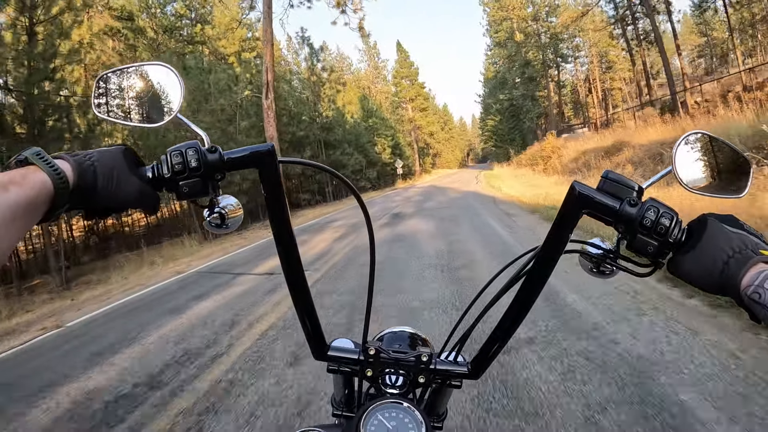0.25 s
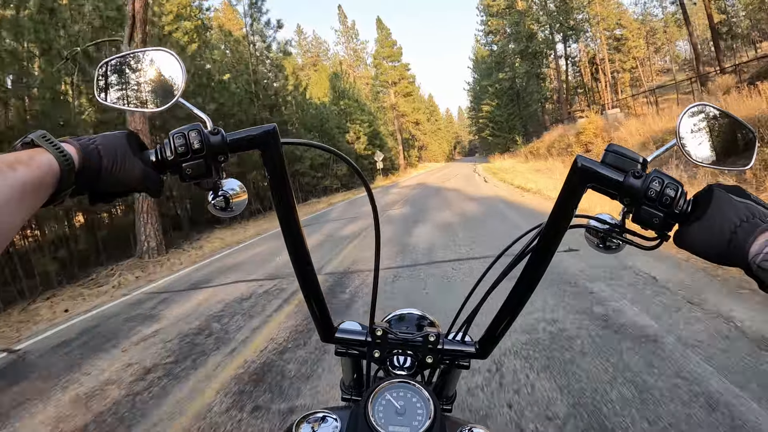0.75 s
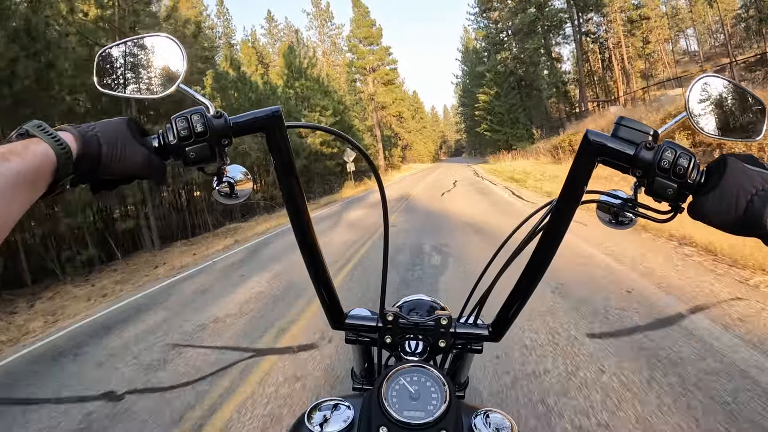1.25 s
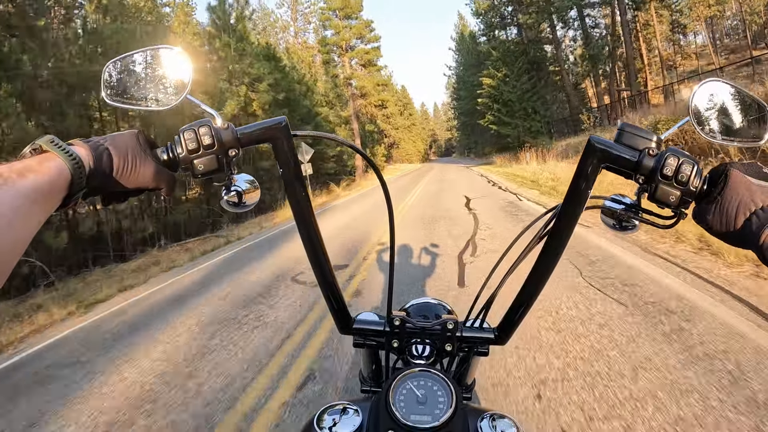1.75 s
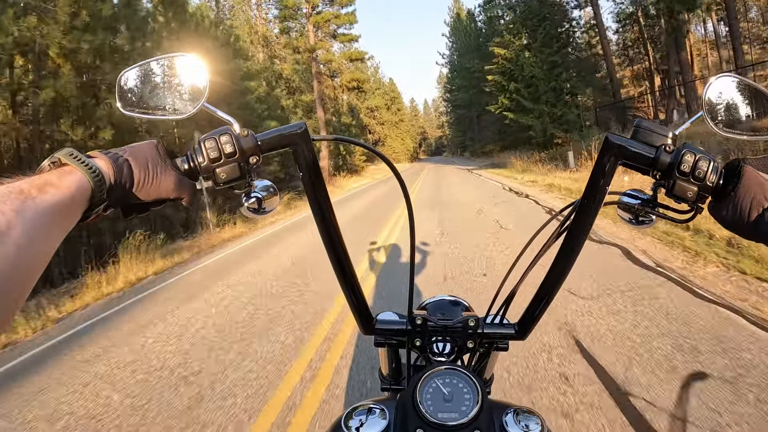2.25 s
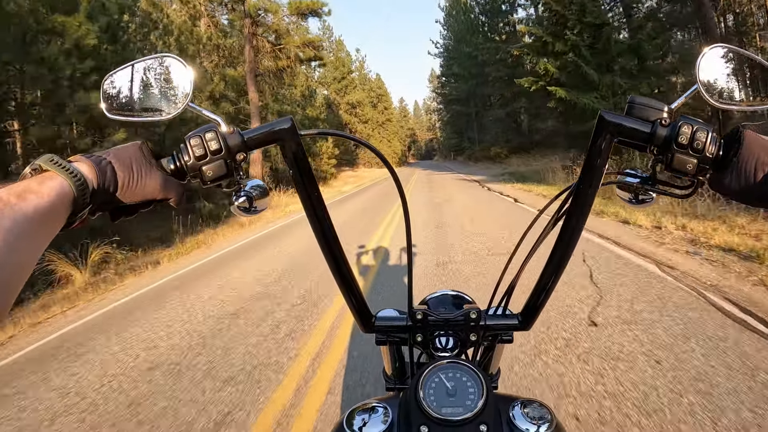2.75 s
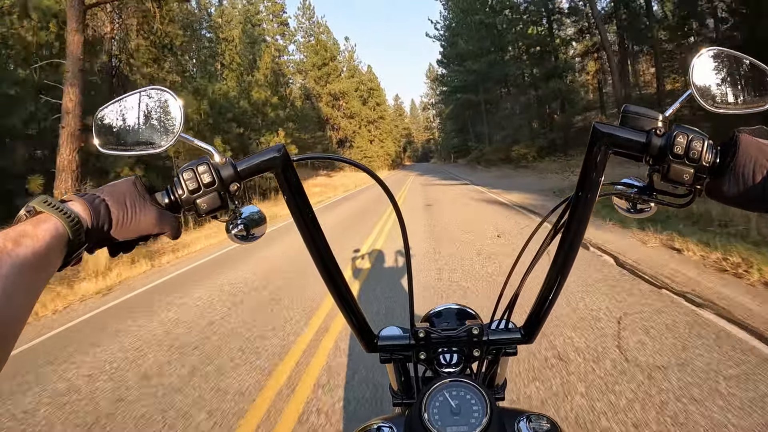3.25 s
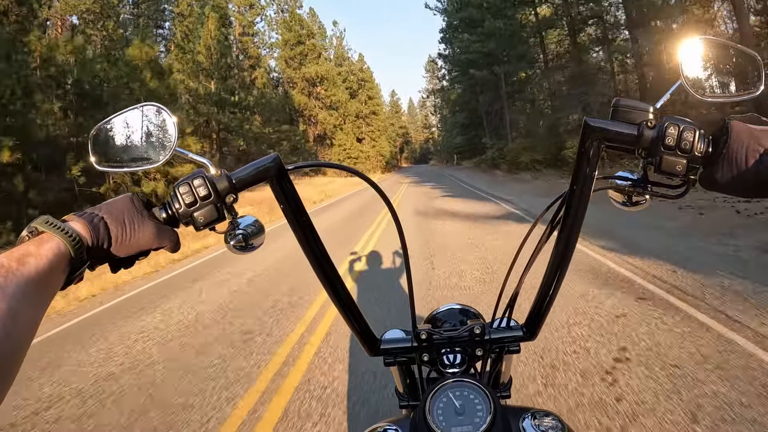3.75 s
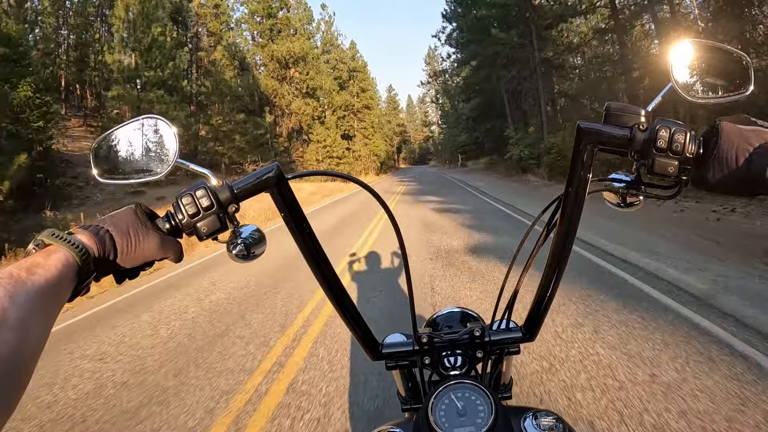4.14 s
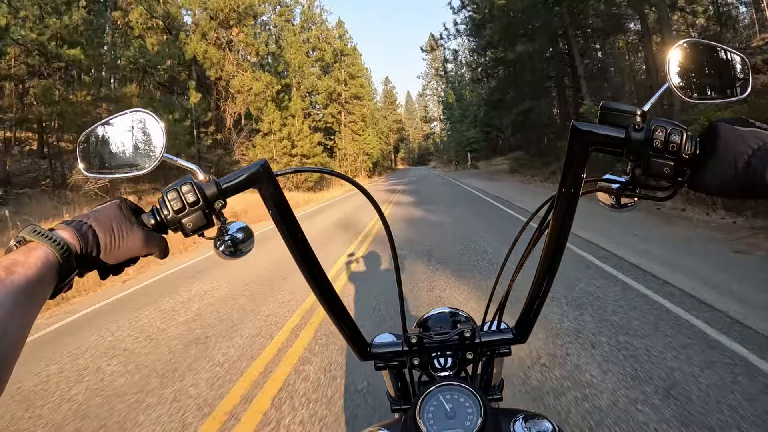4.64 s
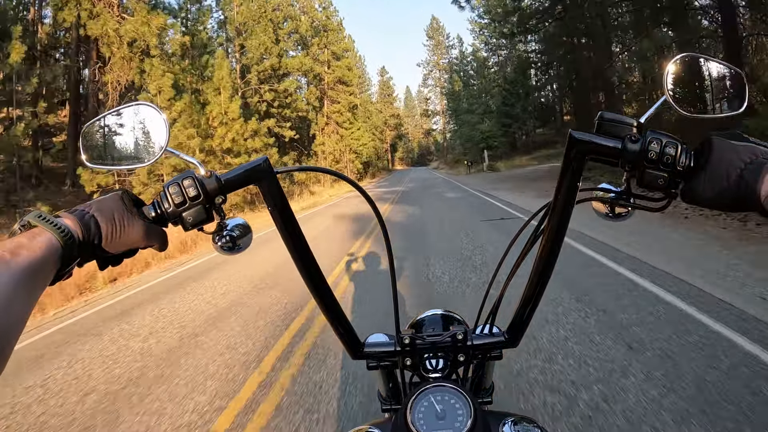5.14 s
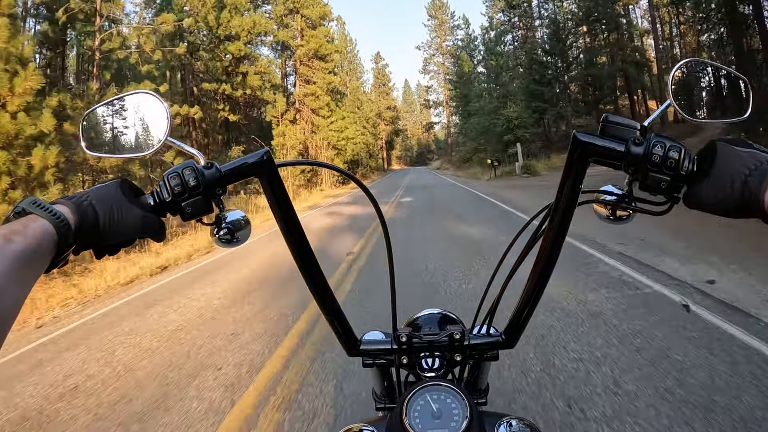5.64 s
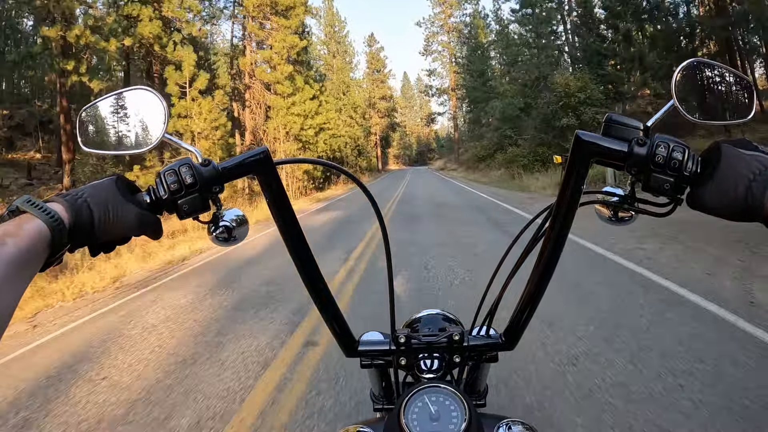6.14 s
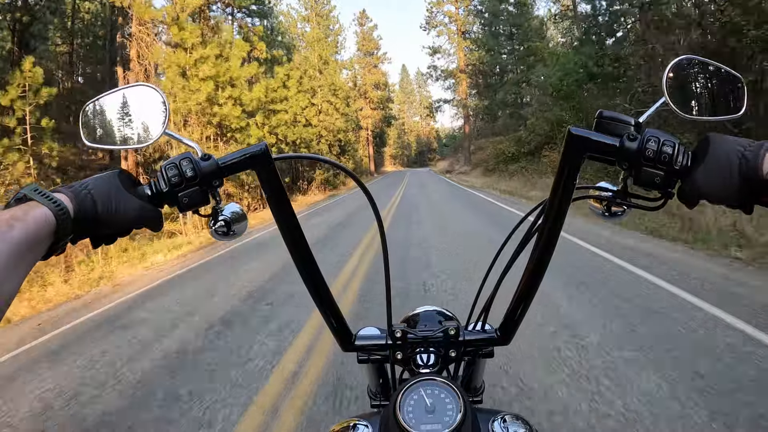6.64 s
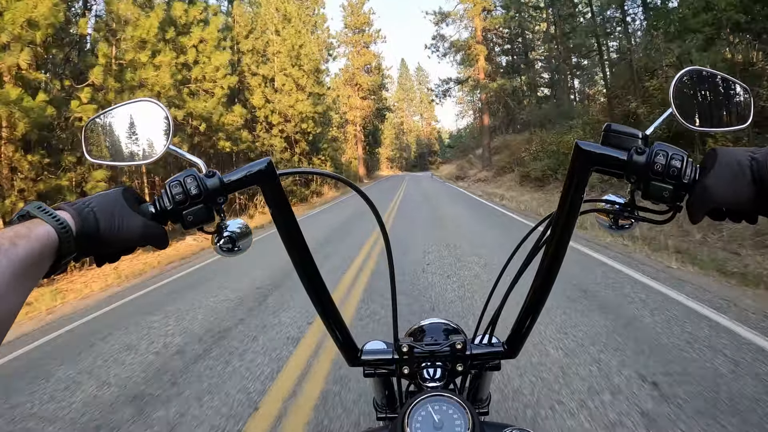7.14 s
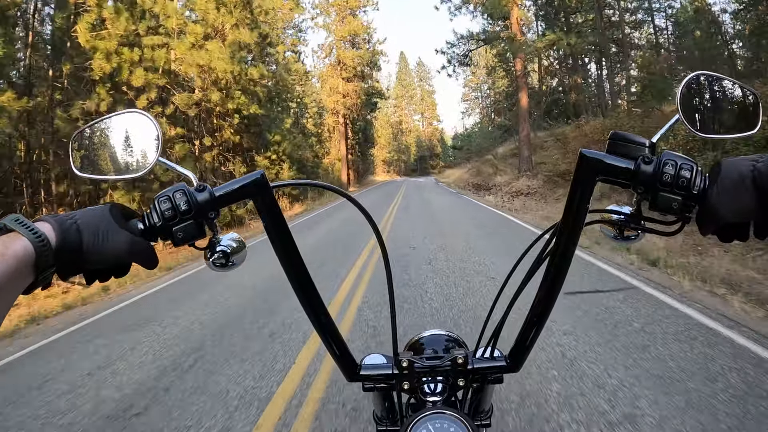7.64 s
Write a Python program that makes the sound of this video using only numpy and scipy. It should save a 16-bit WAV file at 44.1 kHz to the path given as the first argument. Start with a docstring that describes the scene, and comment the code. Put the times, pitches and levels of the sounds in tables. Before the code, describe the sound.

Close, continuous motorcycle ride in open air, captured at the rider's body: booming, lopsided paired exhaust beats, mechanical rattle, thin gear whine, low wind thumps and rushing air and tyres. The engine pulls, briefly cracks and rasps harder, then cruises with less bite while the wind builds to a broad peak. Near the end the throttle shuts, leaving a softer uneven burble as the pitch falls slightly.

```python
"""A forest road, heard from the chest of someone riding a V-twin motorcycle with short open pipes.
It pulls gently, barks as the throttle opens, cruises through a swell of headwind, then runs on, throttle shut.
Two unevenly spaced exhaust pulses per cycle ring pipe resonances, with a crack and noise bursts for the rasp.
A partly repeating noise makes the valve-gear clatter, sines locked to the crank the drive-train whine,
and coloured noise the buffeting and rushing air."""
import sys
import numpy as np
from scipy import signal
from scipy.fft import rfft, irfft, next_fast_len
from scipy.io import wavfile
from scipy.ndimage import uniform_filter1d

SR = 44100
rng = np.random.default_rng(int(sys.argv[2]) if len(sys.argv) > 2 else 0)


def store_wav(level_fs):
    """Save 16-bit WAV to argv[1]."""
    pcm = np.round(np.clip(np.atleast_2d(level_fs), -1, 1) * 32767)
    wavfile.write(sys.argv[1], SR, pcm.T.astype(np.int16))


N = 348390
TIME = np.arange(N) / SR

# engine speed: (time [s], four-stroke cycle rate [Hz])
SPEED = [(0, 20.66), (0.7, 21.61), (1.72, 22.69), (2.5, 24.72), (3.3, 25.94), (4.3, 26.41), (5.6, 26.54),
         (6.5, 26.8), (6.7, 25.31), (6.9, 26.02), (7.3, 25.43), (7.9, 24.17)]
REFERENCE_HZ = 26.94  # cycle rate about which levels change with engine speed
BLOW_LAG = .045  # from the valve's opening to the blowdown pulse [cycles]


def undb(db):
    """Decibels to gain."""
    return 10 ** (np.asarray(db) / 20)


def unit(x):
    """Scale to rms 1."""
    return x / np.sqrt(np.mean(x ** 2))


def curve(table):
    """Points joined by straight lines in time."""
    return np.interp(TIME, *np.transpose(table))


def walk(rate):
    """Slow random drift with rms 1: random steps at the given rate [Hz], smoothed twice."""
    step = int(SR / rate)
    steps = np.repeat(rng.standard_normal(N // step + 1), step)
    smooth = uniform_filter1d(uniform_filter1d(steps, step), step)
    return unit(smooth[:N])


def through(x, response):
    """Pass a sound through a frequency response."""
    size = next_fast_len(N + SR // 2)  # spare room for the ringing
    hz = np.maximum(np.arange(size // 2 + 1) * SR / size, 1)
    return irfft(rfft(x, size) * response(hz), size)[:N]


def colour(x, points):
    """Give a sound a spectrum, drawn on a logarithmic frequency axis, at rms 1."""
    hz, db = np.transpose(points)
    return unit(through(x, lambda f: undb(np.interp(np.log(f), np.log(hz), db))))


def resonance(f, hz, width):
    """Response of one damped resonance, gain 1 at its centre."""
    return 1 / (1 + 1j * (f / hz - hz / f) * hz / width)


def ring(x, modes, soft_hz=483, muffle_hz=375):
    """Rounded gas pulses ring a set of pipe resonances; the rider's body shades the upper ones."""
    def response(f):
        pipe = sum(np.sign(sign) * undb(db) * resonance(f, hz, width) for hz, width, db, sign in modes)
        rounding = 1 - (f / soft_hz) ** 2 + 1j * f / soft_hz
        shading = np.sqrt(1 + (f / muffle_hz) ** 10)
        return pipe / rounding / shading
    return through(x, response)


def pulses(crank, angles, sizes):
    """One click whenever the crank reaches one of the angles, shared between two samples."""
    inside = (angles > crank[0]) & (angles < crank[-2])
    at = np.interp(angles[inside], crank, np.arange(N))
    i, part = at.astype(int), at % 1
    early = np.bincount(i, sizes[inside] * (1 - part), N)
    late = np.bincount(i + 1, sizes[inside] * part, N)
    return early + late


def rider():
    """Throttle opening and share of overrun, both 0-1; overrun takes over as the throttle snaps shut."""
    # a gentle pull, a quick twist that eases off, then cruising: (time [s], throttle opening [0-1])
    throttle_points = [(0, 0.59), (1.77, 0.49), (1.97, 1), (2.38, 0.74), (2.78, 0.61), (2.92, 0.58),
                       (3.8, .22), (5.4, 0.28)]
    shut_s, closing_s, overrun_share = 6.53, 0.14, 0.77
    overrun = overrun_share * np.clip((TIME - shut_s) / closing_s, 0, 1)
    return curve(throttle_points), overrun


def headwind():
    """One long swell of the headwind, 0-1, a bell that rises faster than it falls."""
    peak_s, rise_s, fall_s = 4.99, 1.02, 1.43
    spread = np.where(TIME < peak_s, rise_s, fall_s)
    return np.exp(-.5 * ((TIME - peak_s) / spread) ** 2)


def wind(gust_db=-0.16, flutter_db=1.04):
    """Eddies thump the microphone; air and tyres rush above them, fluttering. Both grow with the headwind."""
    # spectrum of the rushing air and tyres: (frequency [Hz], relative level [dB per Hz])
    rush_spectrum = [(40, -26), (120, 4.5), (250, -2), (450, -10.5), (800, -22.5), (1200, -36.5),
                     (1600, -27), (2500, -33), (5000, -41.5), (6200, -46), (7600, -50), (9000, -56),
                     (15000, -64.5)]
    # spectrum of the low buffeting: (frequency [Hz], relative level [dB per Hz])
    rumble_spectrum = [(10, -18.5), (22, 3), (45, 5), (70, -4), (120, -15.5), (250, -42.5), (600, -77)]
    # level in calm air, and gain at the top of the swell
    rush_db, rush_swell_db = -28.5, 5.5
    buffet_db, buffet_swell_db = -24, 6.5
    swell = headwind()
    rumble = colour(rng.standard_normal(N), rumble_spectrum) * undb(buffet_db + buffet_swell_db * swell)
    eddies = rng.standard_normal(N) * undb(gust_db * walk(21) + flutter_db * walk(70))
    rush = colour(eddies, rush_spectrum) * undb(rush_db + rush_swell_db * swell)
    return rumble + rush


def whine(crank, whine_db=-0.36, waver_db=2, slack_db=-5):
    """Chain and gears sing faintly at multiples of the cycle rate, wavering, softer on the overrun."""
    # drive-train tones: (multiple of the cycle rate, relative level [dB], growth [dB per Hz of cycle rate])
    tone_table = [(16, -44, 1), (20, -52, -.5), (22, -50, 2), (23, -50, .5), (25, -46, 3), (26, -50, .3),
                  (30, -51, 4), (31, -53, 1), (35, -54, .3), (37, -53, -.3), (45, -47, 7), (46, -49, 7)]
    faster = curve(SPEED) - REFERENCE_HZ
    _, overrun = rider()
    tones = np.zeros(N)
    for order, db, growth in tone_table:
        level = undb(db + growth * faster + waver_db * walk(4.8))
        tones += np.sqrt(2) * level * np.sin(2 * np.pi * order * crank)
    return tones * undb(whine_db + slack_db * overrun)


def clatter(crank, loose=1.9, loose_db_per_hz=1.4, throb=0.15, count=2048):
    """Valve gear and chain: a partly repeating rattle, looser with speed, throbbing twice a cycle."""
    # spectrum of the rattle: (frequency [Hz], relative level [dB per Hz])
    clatter_spectrum = [(250, -20), (400, -6), (520, -3), (660, 0), (800, 1), (1050, 3), (1140, 5),
                        (1215, 4), (1380, -4.5), (2000, -19.5), (4000, -24.5), (4900, -29), (6000, -35.5),
                        (12000, -47.5)]
    level_db, db_per_hz, wind_swell_db = -40, 0.03, 2.5  # also grows along with the headwind
    faster = curve(SPEED) - REFERENCE_HZ
    one_cycle = rng.standard_normal(count)
    steady = np.interp(crank % 1 * count, np.arange(count), one_cycle)
    throbbing = 1 + throb * np.cos(4 * np.pi * (crank - BLOW_LAG))
    play = loose * undb(loose_db_per_hz * faster)  # random part against the repeating part
    rattle = throbbing * (unit(steady) + play * rng.standard_normal(N)) / np.hypot(1, play)
    return colour(rattle, clatter_spectrum) * undb(level_db + db_per_hz * faster + wind_swell_db * headwind())


def exhaust(crank, cylinder, pipe, scatter_db=-0.45, crack_hz=1170, crack_width=450, crack_lead=0.016,
            choke=0.32, blow_share=0.99, crack_scatter_db=1.3, rasp_scatter_db=1.84, overrun_scatter_db=1.26):
    """One cylinder: the valve cracks open, gas blows down and rasps, then the piston pushes out the rest."""
    # blowdown resonance: (frequency [Hz], width [Hz], relative level [dB], polarity)
    blow_modes = [(109.7, 20.1, -18, -1)]
    # pipe full of cool gas on the overrun: (frequency [Hz], width [Hz], relative level [dB], polarity)
    cool_modes = [(103.4, 172, -20.5, -1), (143.3, 60.4, -20.5, 1), (201, 174, -28.5, 1),
                  (294.4, 23, -36, 1)]
    # spectrum of the gas jet: (frequency [Hz], relative level [dB per Hz])
    rasp_spectrum = [(200, -14), (600, -2), (1000, 6.5), (1230, 7), (1480, -9), (1800, -0.5), (2300, -12.5),
                     (2950, -10), (3900, -16), (4500, -12.5), (5200, -13), (5800, -32.5), (7000, -28.5),
                     (9000, -35.5), (15000, -37.5)]
    push_lag = .081  # from the valve's opening [cycles]
    # the pipes boom less as the engine speeds up, and less on the overrun
    pipe_db, pipe_db_per_hz, pipe_overrun_db = 64.5, -0.52, -2.5
    # a faint tick until the throttle passes a threshold and the pulse fronts steepen into a bark
    tick_db, crack_db, crack_range_db, bark_throttle, bark_knee = 4.5, 22, 19.5, .6, 0.02
    # rasp at full throttle, its fall as the throttle closes, and its level on the overrun
    rasp_db, rasp_range_db, rasp_overrun_db = -33, 23, -46.5

    place, blow_db, own_crack_db, own_rasp_db, cool_db = cylinder
    throttle, overrun = rider()
    firing = 1 - overrun
    boom_db = pipe_db + pipe_db_per_hz * (curve(SPEED) - REFERENCE_HZ) + pipe_overrun_db * overrun
    steep = 1 / (1 + np.exp((bark_throttle - throttle) / bark_knee))
    bark = undb(tick_db) + steep * undb(crack_db - crack_range_db * (1 - throttle))
    bark = bark * undb(own_crack_db) * firing
    gas = undb(rasp_db - rasp_range_db * (1 - throttle)) * firing + undb(rasp_overrun_db) * overrun

    # each cycle varies a little in timing and strength
    chance = rng.standard_normal((int(crank[-1]) + 2, 3)).T
    opens = np.arange(chance.shape[1]) + place + .002 * chance[0]  # crank angle [cycles]
    size = undb(scatter_db * chance[1])

    # an open throttle moves the weight from the push to the blowdown
    push = ring(pulses(crank, opens + push_lag, size) * (1 - choke * throttle) * firing, pipe)
    blow_pulses = pulses(crank, opens + BLOW_LAG, size) * blow_share * throttle * firing
    blow = ring(blow_pulses * undb(blow_db), blow_modes)
    # a shut one leaves uneven puffs of cool gas
    puff_pulses = pulses(crank, opens, undb(overrun_scatter_db * chance[1]))
    puff = ring(puff_pulses * overrun * undb(cool_db), cool_modes)

    # the steep pulse front sets off a short metallic ring, four resonances in a row so that it swells
    front = pulses(crank, opens - crack_lead, undb(crack_scatter_db * chance[2]))
    crack = through(front * bark, lambda f: resonance(f, crack_hz, crack_width) ** 4)

    # the jet of gas swells within two milliseconds and trails off
    age = TIME[:SR // 20]
    jet_shape = age / .0019 * np.exp(-age / .0019) + .11 * np.exp(-age / .013)
    jet_pulses = pulses(crank, opens, undb(rasp_scatter_db * chance[2]))
    jet = signal.fftconvolve(jet_pulses, jet_shape)[:N]
    rasp = unit(jet) * colour(rng.standard_normal(N), rasp_spectrum) * gas * undb(own_rasp_db)
    return (push + blow + puff) * undb(boom_db) + crack + rasp


def scene():
    """Both cylinders, the valve gear and the drive train follow one crank, in the wind of the ride."""
    # front pipe resonances: (frequency [Hz], width [Hz], relative level [dB], polarity)
    front_pipe = [(57, 13, -39.5, -1), (137.53, 9.2, -20.5, -1), (155.4, 103, -28.5, 1),
                  (227.6, 64, -29, -1), (275, 51, -35.5, -1)]
    # rear pipe resonances: (frequency [Hz], width [Hz], relative level [dB], polarity)
    rear_pipe = [(111.8, 39.2, -22, 1), (141.3, 18.2, -19, -1), (199.2, 9, -29.5, 1), (274.7, 43, -40, -1),
                 (323.3, 25, -45, -1)]
    # front and rear cylinder of a 45 degree twin, gains relative to the shared levels:
    # (place in the cycle [0-1], blowdown [dB], crack [dB], rasp [dB], overrun puff [dB])
    cylinders = [(0, 0, 0, 0, 0), (7 / 16, -4.5, -18.5, 0.12, -0.18)]
    start = -.285  # crank position at the start [cycles]
    crank = start + np.cumsum(curve(SPEED)) / SR  # in four-stroke cycles
    pipes = sum(exhaust(crank, cylinder, pipe) for cylinder, pipe in zip(cylinders, (front_pipe, rear_pipe)))
    return (wind() + whine(crank) + clatter(crank) + pipes)[None]


def record(dry):
    """A steep elliptic low-pass removes the top of the treble."""
    top_hz = 15800
    low_pass = signal.ellip(8, .2, 70, top_hz, fs=SR, output="sos")  # 0.2 dB ripple, 70 dB rejection
    return signal.sosfilt(low_pass, dry)


dry = scene()
out = record(dry)
store_wav(out)
```